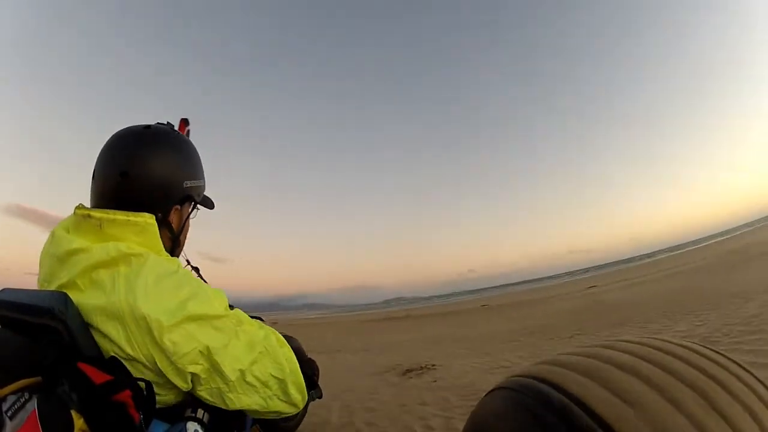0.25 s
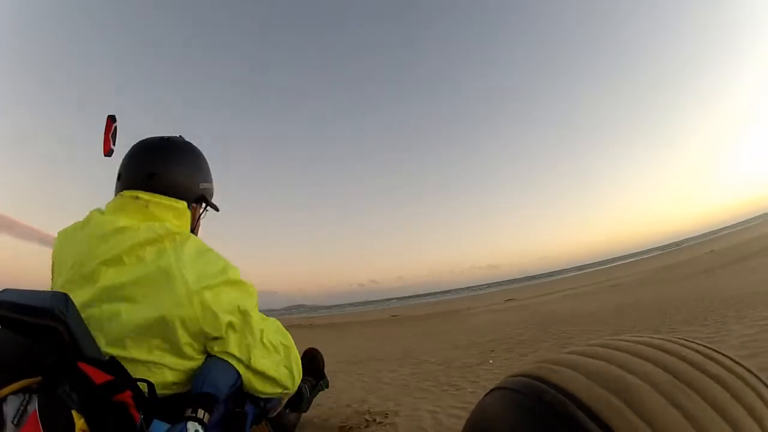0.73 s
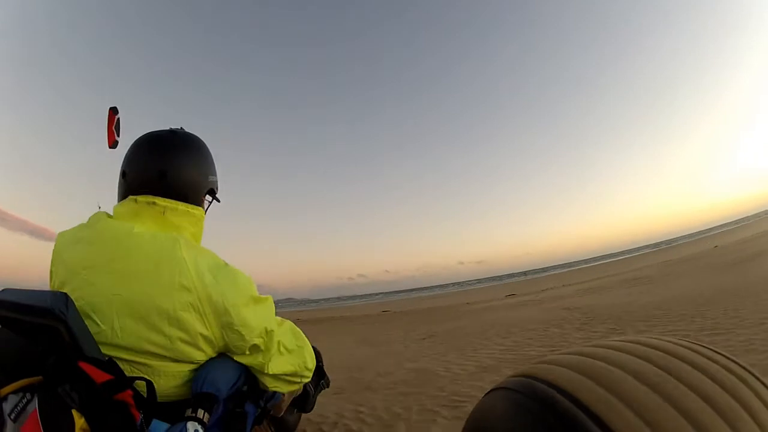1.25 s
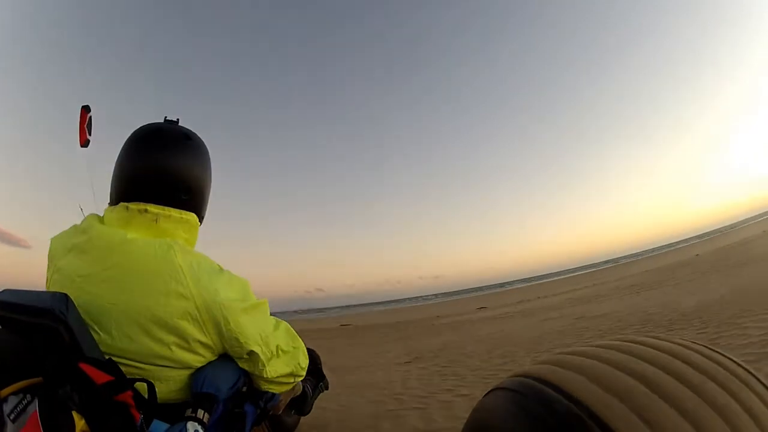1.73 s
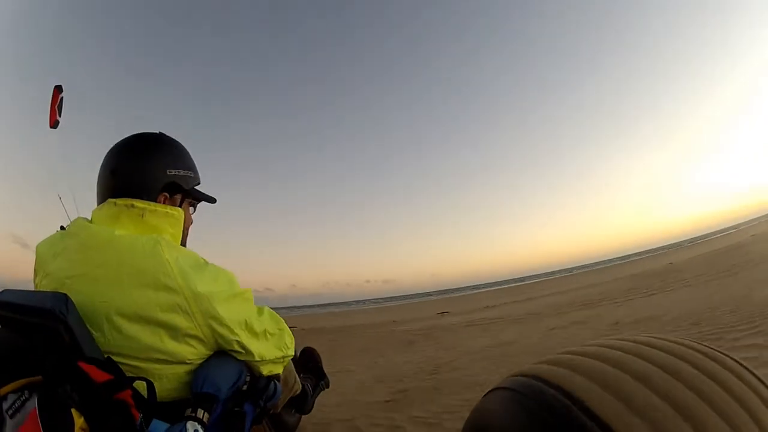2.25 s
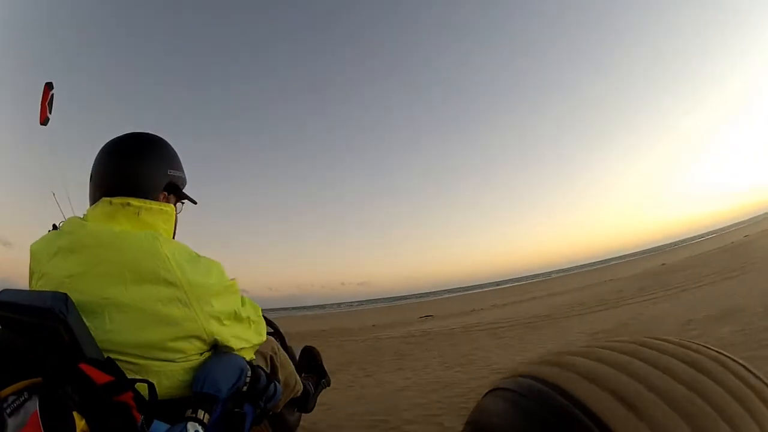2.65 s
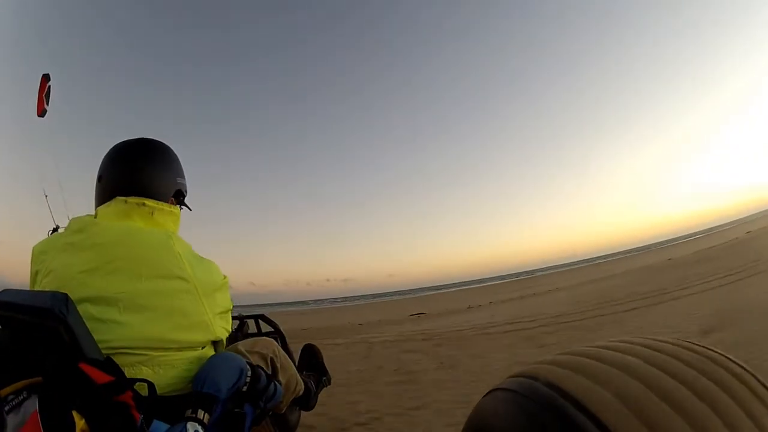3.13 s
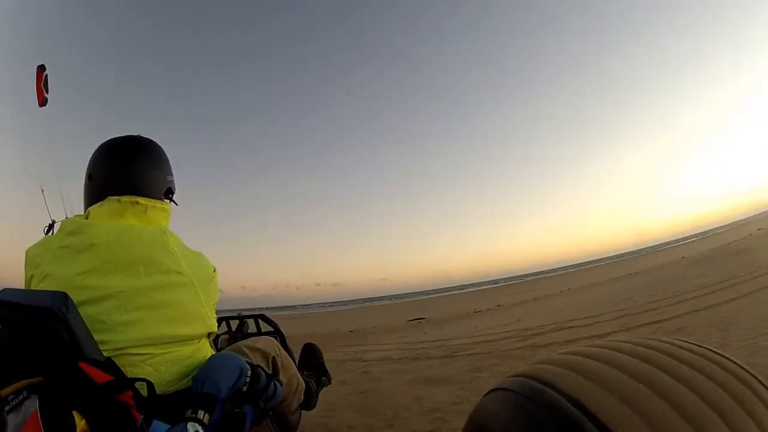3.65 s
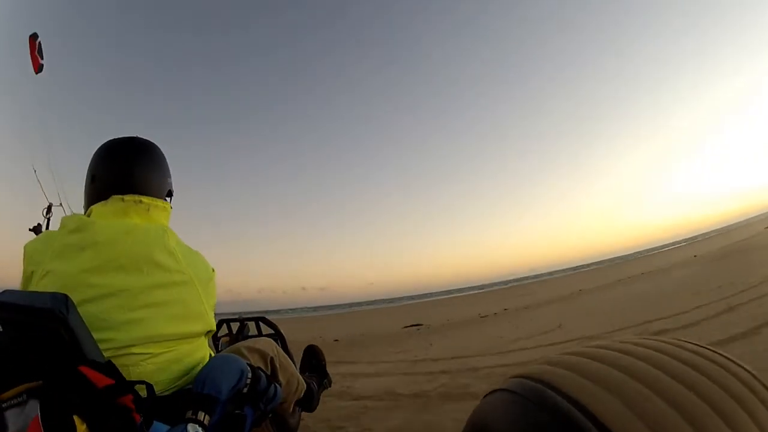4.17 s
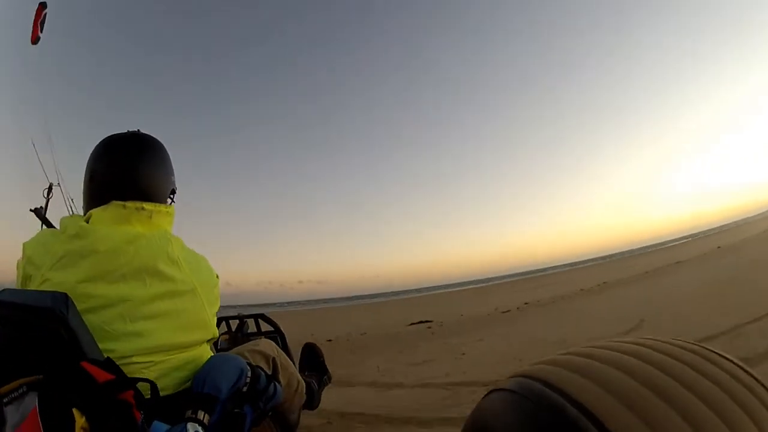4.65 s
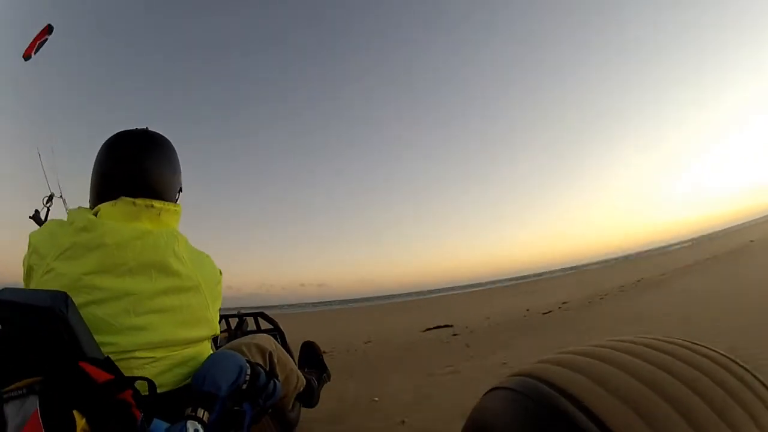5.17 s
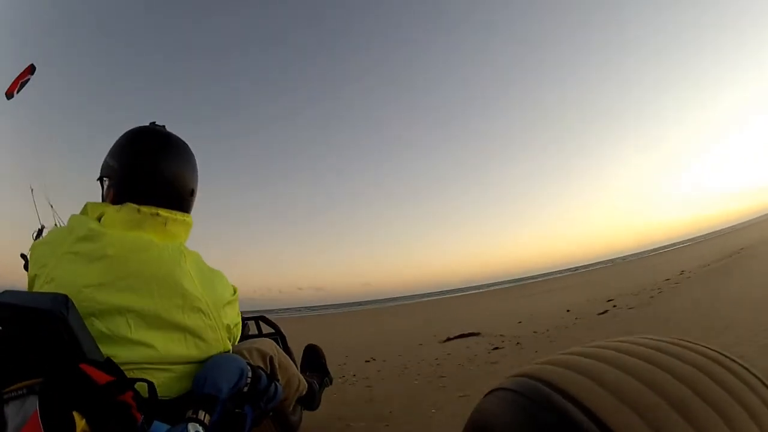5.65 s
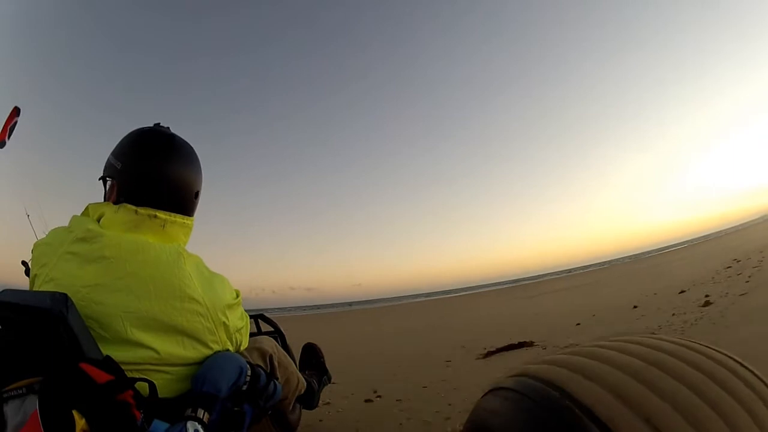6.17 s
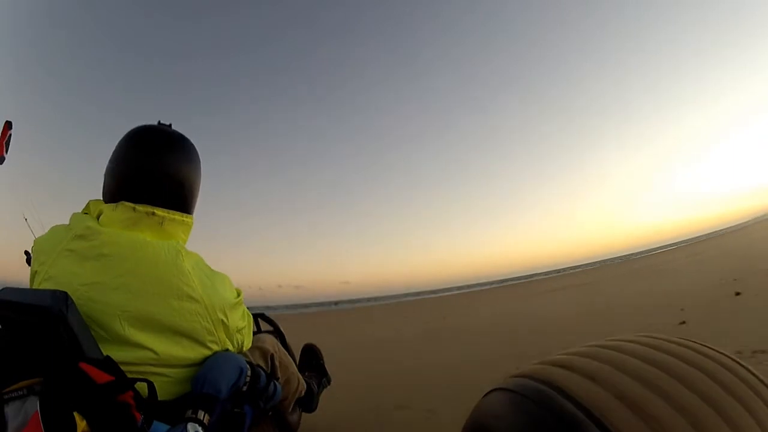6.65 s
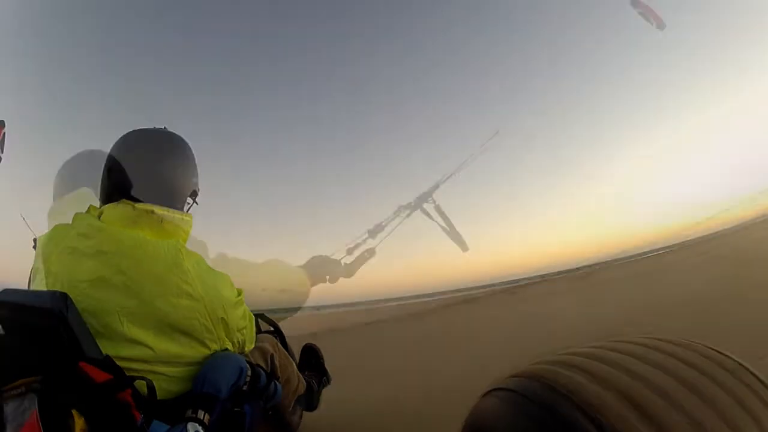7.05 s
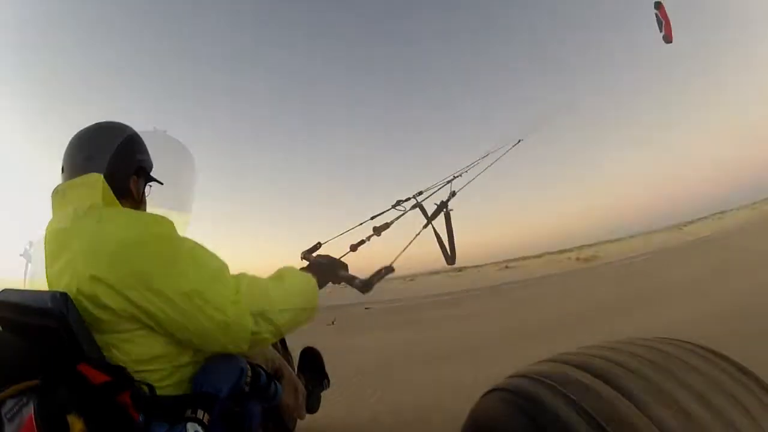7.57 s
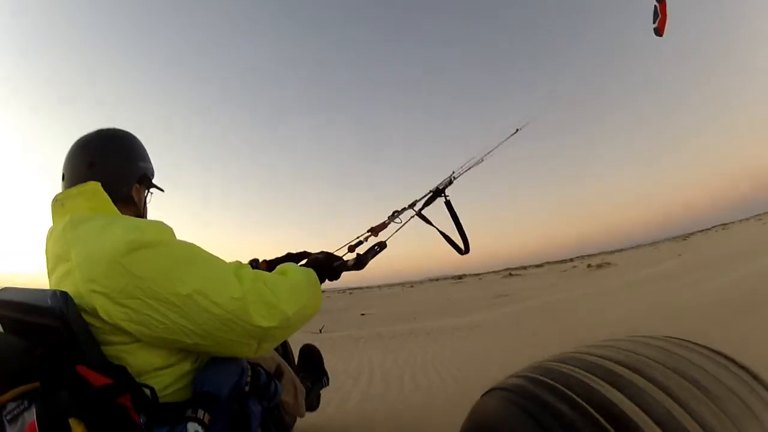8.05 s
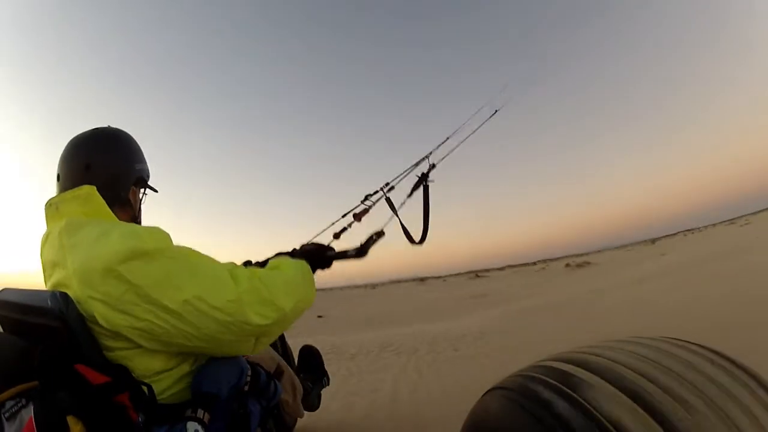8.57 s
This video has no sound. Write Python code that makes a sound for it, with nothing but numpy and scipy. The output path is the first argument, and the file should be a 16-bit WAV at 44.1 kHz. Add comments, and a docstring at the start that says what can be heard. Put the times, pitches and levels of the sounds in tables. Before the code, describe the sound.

A kite buggy rolls fast over hard, rippled sand, heard from a plastic case on its frame. Deep wind buffeting and low tyre roar run throughout, under a thin hiss and constant small bright ticks. The case clacks sharply at about 0.2 seconds, then rattles lightly, with single clacks near 2 and 3.3 seconds. The rumble swells briefly around 1.1 seconds, rises again at 2.4 and stays strong until 7. Scattered hollow knocks come from the frame, loudest between 4.7 and 5.4 seconds. From 4 seconds the case rattles rapidly, mixing sharp clacks with duller chatter, hardest around 6.2 and 6.8 seconds. Rumble and rattle ease at about 7.5 seconds. From 7.8 the hard clacking returns, and heavy gusts and bumps swell the rumble until the end, near 8.8 seconds.

```python
"""On hard, rippled sand, a kite buggy rolls fast, heard from a plastic camera case on its frame.
Wind and tyres lay down a low rumble that swells with speed, gusts and bumps, under a thin hiss.
Loose parts tick against the case throughout, and bumps knock a joint of the frame.
Up front, the ripples rock the case in its mount: a sharp clack at one stop, a duller chatter at the other."""
import sys
import numpy as np
from scipy import signal
from scipy.fft import rfft, irfft, next_fast_len
from scipy.io import wavfile

SR = 44100
rng = np.random.default_rng(int(sys.argv[2]) if len(sys.argv) > 2 else 0)


def unload_wav(signal):
    """Save mono or channel-first audio to the path in sys.argv[1] as 16-bit WAV at rate SR, clipped to [-1, 1]."""
    wavfile.write(
        sys.argv[1],
        SR,
        np.round(np.clip(np.atleast_2d(signal).T, -1, 1) * 32767).astype(np.int16),
    )


N = 388521
TIME = np.arange(N) / SR


def amp(db):
    return 10 ** (np.asarray(db) / 20)


def curve(rows, s):
    """A table's points joined by straight lines, read at times s."""
    return np.interp(s, *np.transpose(rows))


def shaped_noise(gain_at):
    """Noise of unit rms, filtered by a gain that depends on frequency."""
    size = next_fast_len(N)
    gain = gain_at(np.fft.rfftfreq(size, 1 / SR))
    x = irfft(rfft(rng.standard_normal(size)) * gain, size)[:N]
    return x / np.sqrt(np.mean(x ** 2) + 1e-20)


def noise(spectrum):
    """A noise bed of unit rms, coloured by a spectrum table."""
    hz, db = np.transpose(spectrum)
    return shaped_noise(lambda f: amp(np.interp(np.log(f + 1), np.log(hz), db)))


def wander(rate_hz):
    """Random drift of unit rms, mostly slower than rate_hz."""
    return shaped_noise(lambda f: np.exp(-(f / rate_hz) ** 2))


def blows(s, size):
    """A train of single impulses at times s."""
    return np.bincount(np.clip(np.ravel(s) * SR, 0, N).astype(int), np.ravel(size), N + 1)[:N]


def bounces(s, db, length_s, rest_db, count):
    """Each blow is a first contact and a few more scattered after it, sharing its energy."""
    scatter, strength = rng.random((len(s), 2, count)).transpose(1, 0, 2)
    late = (np.arange(count) + scatter) / count
    first = amp(db) / np.sqrt(1 + count / 2 * amp(rest_db) ** 2)
    rest = amp(rest_db) * first[:, None] * (strength + .5) * np.exp(-late) * (-1) ** np.arange(count)
    return blows(s, first) + blows(s[:, None] + length_s * late, rest)


def ring(modes, tilt_db=0, far=False, size=5000):
    """Decaying modes, peak 1, tilted in dB an octave; far from the blow they alternate in sign."""
    t = np.arange(size) / SR
    response = np.zeros(size)
    for k, (hz, width, db) in enumerate(modes):
        gain = (-1) ** (k * far) * amp(db + tilt_db * np.log2(hz)) * width
        response += gain * np.exp(-np.pi * width * t) * np.sin(2 * np.pi * hz * t)
    return response / abs(response).max()


def strike(train, response):
    return signal.oaconvolve(train, response)[:N]


def with_buzz(x, level_db, t60_s, size=4000):
    """Adds the short, diffuse buzz that each blow leaves in the mount."""
    tail = rng.standard_normal(size) * np.exp(-np.log(1000) * np.arange(size) / SR / t60_s)
    return x + amp(level_db) * strike(x, tail / np.linalg.norm(tail))


# the rumble's envelope, rising with speed: (time [s], level [dB])
RIDE = [(0, -35.5), (0.6, -35.5), (1.15, -28), (1.6, -34), (2.15, -33.5), (2.4, -28), (3.7, -28),
        (4.05, -25), (4.4, -26.5), (5.0, -27.5), (6.5, -26.5), (6.88, -25.5), (7.2, -28.5), (7.7, -36),
        (8.0, -33.5), (8.81, -32.5)]
CRUISE_DB = curve(RIDE, TIME).mean()

def speed_swell(s):
    """How far speed lifts the ride above its average level, in dB."""
    return curve(RIDE, s) - CRUISE_DB


# gusts and bumps: (centre time [s], length [s], wind lift [dB], tyre lift [dB])
SURGES = [(1.821, 0.54, 4, 0), (2.94, .15, 7.5, 1), (3.495, 0.3, 6.5, -2), (6.011, 0.11, 10.5, 1),
          (6.815, 0.27, 0, 3), (8.04, 0.29, 12.5, 7), (8.257, 0.14, 15, -0.5), (8.573, 0.3, 14, 5.5),
          (8.8, 0.16, 14.5, -0.5)]
WIND_LIFT, TYRE_LIFT = 2, 3  # columns

def surge(column):
    """Each gust or bump eases the level away and back, in dB."""
    return sum(row[column] * np.cos(np.pi * np.clip((TIME - row[0]) / row[1], -.5, .5)) ** 2
               for row in SURGES)


# thin, high air: (frequency [Hz], level [dB])
HISS_SPECTRUM = [(1000, -35), (4000, -28), (7500, -28), (9500, -15), (11000, -20), (11400, 0), (12650, 0),
                 (13050, -20), (14500, -20), (16000, -40)]

def hiss(roll_db):
    """A faint top layer that rises and falls with the tyres."""
    return noise(HISS_SPECTRUM) * amp(CRUISE_DB + 0.96 * roll_db - 28)


# the frame's hollow body: (frequency [Hz], level [dB])
DRUM_SPECTRUM = [(250, -34), (450, -9), (560, -5), (670, -2), (800, -15.5), (920, -21), (1100, -16.5),
                 (1600, -43)]

def frame_drum(roll_db):
    """The frame drums along at any speed, and harder on bumps."""
    return noise(DRUM_SPECTRUM) * amp(-42 + 0.08 * roll_db + 0.9 * surge(TYRE_LIFT))


# tyres on hard sand: (frequency [Hz], level [dB])
TYRE_SPECTRUM = [(40, -41), (90, -5), (135, 0.5), (200, -2.5), (320, -5.5), (520, -9), (670, -16),
                 (770, -27), (900, -29), (1120, -33.5), (1450, -35.5), (1800, -34), (2500, -31.5),
                 (4000, -46.5), (16000, -53.5)]

def tyre_roar(roll_db):
    """The rolling tyres send a low roar up through the frame."""
    return noise(TYRE_SPECTRUM) * amp(CRUISE_DB + roll_db + 1)


# the wind's deep buffeting: (frequency [Hz], level [dB])
WIND_SPECTRUM = [(10, -1.5), (22, 7), (35, 1.5), (60, 5.5), (85, 4.5), (120, -2.5), (200, -14), (500, -41),
                 (2000, -81)]

def wind(lump_db=2.0):
    """Wind hits the case in uneven lumps, swelling with speed and gusts."""
    level_db = CRUISE_DB + 0.99 * speed_swell(TIME) + surge(WIND_LIFT) + 2
    return noise(WIND_SPECTRUM) * amp(level_db + lump_db * wander(12.7))


def tick_ring():
    """The short, bright ring of a light contact; doubly resonant, so it has no bass."""
    single = ring([(5350, 1100, 5.0), (6540, 920, 2.5), (8420, 780, -9.0)], size=400)
    double = np.convolve(single, np.diff(single))
    return double / abs(double).max()


# modes of the plastic case: (frequency [Hz], width [Hz], level [dB])
CASE_MODES = [(705, 250, 9), (1070, 160, 1), (1449, 260, 7.5), (2550, 540, 2.5), (2908, 155, 10),
              (3180, 810, 1), (3710, 275, 2.5), (5026, 490, 5), (6730, 350, 3), (8170, 210, -2.5),
              (8980, 166, 1), (9800, 260, -41), (11300, 160, -28), (14500, 250, -5)]

def ticks(level_db=-36, spread_db=3, base_per_s=135, body_db=-16):
    """Small loose parts buzz against the case in bright clusters, harder with speed."""
    chance = base_per_s / SR * np.exp(0.7 * wander(60))
    s = np.flatnonzero(rng.random(N) < chance) / SR
    accent_db = spread_db * np.minimum(rng.exponential(1, N)[:len(s)], 3)
    db = level_db + 0.43 * speed_swell(s) + accent_db
    train = bounces(s, db, length_s=0.0013, rest_db=2, count=3)
    return strike(train, tick_ring()) + amp(body_db) * strike(train, ring(CASE_MODES, tilt_db=4))


# the frame's main modes and its upper ring: (frequency [Hz], width [Hz], level [dB])
FRAME_MODES = [(545, 60, -4), (660, 40, 6), (790, 90, -6), (1000, 110, -12), (1108, 75, -4),
               (1310, 120, -20), (10890, 60, -23), (11330, 60, -22), (12670, 60, -23), (13110, 60, -25)]
UPPER_MODES = [(1430, 84, -2), (1743, 170, 6), (1970, 190, -7)]
# hits on the frame: (time [s], body level [dB], upper ring level [dB])
KNOCKS = [(0.2704, -34, -37.5), (1.2635, -27.5, -49), (1.3462, -29.5, -49), (1.5456, -31.5, -53),
          (1.9776, -31.5, -53), (2.0502, -32.5, -48), (2.3037, -27.5, -53), (3.677, -24.5, -56),
          (3.7618, -33, -48.5), (4.2642, -22.5, -44), (4.6903, -25.5, -46), (4.861, -23, -37),
          (5.1135, -18.5, -38.5), (5.1887, -17, -39), (5.3324, -16, -35.5), (6.4768, -33, -50),
          (7.0529, -29, -50), (7.2943, -25.5, -51), (7.8341, -32.5, -39)]

def knocks(split_hz=900):
    """Bumps knock a loose joint of the frame, which bounces, buzzes and rings briefly."""
    s, body_db, ring_db = np.transpose(KNOCKS)
    low = bounces(s, body_db + 8, length_s=.018, rest_db=-6, count=4)
    # a sharp knock stirs the higher modes more than a dull one
    high = bounces(s, (body_db + ring_db) / 2 + 10, length_s=.012, rest_db=-2.5, count=4)
    upper = bounces(s, ring_db + 11, length_s=.012, rest_db=-5, count=4)
    low_modes = [mode for mode in FRAME_MODES if mode[0] < split_hz]
    high_modes = [mode for mode in FRAME_MODES if mode[0] >= split_hz]
    layers = [(low, low_modes), (high, high_modes), (upper, UPPER_MODES)]
    rings = sum(strike(train, ring(modes, far=True)) for train, modes in layers)
    return with_buzz(rings, level_db=-8.5, t60_s=0.073)


# how hard the ripples shake the mount: (time [s], level [dB])
SHAKE = [(0, -42), (0.22, -41), (0.5, -53.5), (0.85, -42.5), (1.5, -55), (1.9, -44), (2.1, -54.5),
         (3.8, -57.5), (4.15, -40.5), (4.8, -37.5), (5.5, -46.5), (5.75, -41), (6.2, -38), (6.55, -40),
         (6.85, -37.5), (7.55, -46), (7.9, -39), (8.81, -39)]

def mount_hits(accents, s, lift_db, spread_db, follow):
    """Times and levels of the accents, filled in with hits at times s that follow the shaking."""
    usual_db = curve(SHAKE, TIME).mean()
    swell_db = curve(SHAKE, s) - usual_db
    # a gently shaken case often falls short of its stop
    unevenness = np.clip(np.sqrt(amp(-swell_db)), .5, 2)
    scatter_db = spread_db * unevenness * np.clip(rng.standard_normal(N)[:len(s)], -2, 1)
    db = usual_db + follow * swell_db + lift_db + scatter_db
    return np.vstack([accents, np.column_stack([s, db])]).T


# the case's hardest chattering landings: (time [s], level [dB])
CHATTERS = [(5.848, -28.5), (6.827, -26), (7.908, -30.5)]

def chatter(swing_times):
    """The case lands on its duller stop in a flurry of bounces, and the frame thuds under it."""
    s, db = mount_hits(CHATTERS, swing_times, lift_db=6.5, spread_db=4.5, follow=0.89)
    flurry = bounces(s, db + 21, length_s=.007, rest_db=0.5, count=7)
    thud = strike(blows(s, amp(db + 6)), ring([(657, 48, 1), (783, 110, -9.5), (1160, 74, -14)]))
    return strike(flurry, ring(CASE_MODES, tilt_db=1.23)) + thud


# the case's hardest clacks: (time [s], level [dB])
CLACKS = [(0.2187, -15), (0.2563, -18), (1.9603, -25), (3.3114, -19.5), (4.0904, -18), (4.2769, -16),
          (4.4405, -15), (4.7114, -16), (4.8407, -14), (5.6202, -15.5), (5.8286, -15), (5.9326, -17),
          (6.109, -12), (6.1862, -13.5), (6.2241, -10.5), (6.264, -11), (6.4908, -16), (6.6277, -16),
          (6.8057, -9), (6.8842, -11), (6.9263, -14), (7.0955, -20), (7.2378, -17.5), (7.8466, -13),
          (7.8885, -12), (8.0454, -11.5), (8.2118, -15), (8.2871, -11.5), (8.4176, -10.5), (8.4578, -9),
          (8.4963, -9)]

def clacks(swing_times, low_cut_hz=2300):
    """The case snaps against its hard stop; returns the clacks and the ticks they shake loose."""
    s, db = mount_hits(CLACKS, swing_times, lift_db=16, spread_db=6.5, follow=1.21)
    contacts = bounces(s, db + 7.5, length_s=.0025, rest_db=10, count=3)
    snap = strike(contacts, ring(CASE_MODES, tilt_db=-1.1))
    # the small stop hardly stirs the low modes, but its push thumps the frame underneath
    snap = signal.lfilter(*signal.butter(2, low_cut_hz, "high", fs=SR), snap)
    thump = strike(blows(s, amp(db - 4.5)), ring([(675, 260, -7.0), (1240, 450, -19)]))
    rebounds = bounces(s + 0.0042, db - 7, length_s=0.0032, rest_db=-4, count=3)
    return snap + thump, strike(rebounds, tick_ring())


def swings(rock_hz=25.18, jitter_s=.0015):
    """Times of the lighter swings to each stop: near rock_hz, in whole cycles between hard clacks."""
    marks = np.concatenate([[0], np.sort(np.transpose(CLACKS)[0]), [N / SR]])
    cycles_per_gap = np.maximum(np.round(np.diff(marks) * rock_hz), 1)
    mark_cycles = np.concatenate([[0], np.cumsum(cycles_per_gap)])
    cycles = np.arange(mark_cycles[-1])
    forth = np.interp(np.setdiff1d(cycles, mark_cycles), mark_cycles, marks)
    back = np.interp(cycles + .5, mark_cycles, marks)
    # leave room for the hard landings
    to_landing_s = abs(back[:, None] - np.transpose(CHATTERS)[0]).min(1)
    back = back[to_landing_s > .5 / rock_hz]
    return [s + jitter_s * rng.standard_normal(N)[:len(s)] for s in (forth, back)]


def rattle():
    """The case rocks between its two stops, clacking one way and chattering the other."""
    forth, back = swings()
    clacking, loose_ticks = clacks(forth)
    return with_buzz(clacking + chatter(back), level_db=-14, t60_s=0.07) + loose_ticks


def scene():
    """The rumble bed with the hits on top, the same in both channels."""
    roll_db = speed_swell(TIME) + surge(TYRE_LIFT) + 0.82 * wander(6.9)  # the tyres' uneven swell
    bed = wind() + tyre_roar(roll_db) + frame_drum(roll_db) + hiss(roll_db)
    return np.tile(bed + rattle() + ticks() + knocks(), (2, 1))


# notches in the housed microphone's response: (frequency [Hz], width [Hz])
MIC_DIPS = [(6000, 2080), (10400, 400), (12020, 78), (13600, 480)]

def record(dry, dip_depth=0.93, high_cut_hz=15500):
    """The housed microphone notches the treble, then a steep high cut takes off the top."""
    for hz, width in MIC_DIPS:
        dry = dry - dip_depth * signal.lfilter(*signal.iirpeak(hz, hz / width, fs=SR), dry)
    low_pass = signal.firwin(255, high_cut_hz, window=("kaiser", 9), fs=SR)
    return signal.oaconvolve(dry, low_pass[None], "same")


dry = scene()
out = record(dry)
unload_wav(out)
```